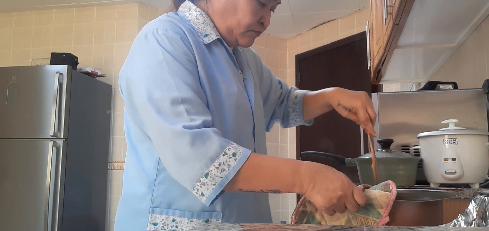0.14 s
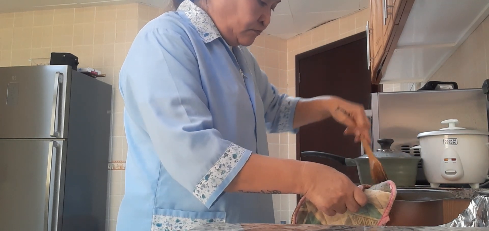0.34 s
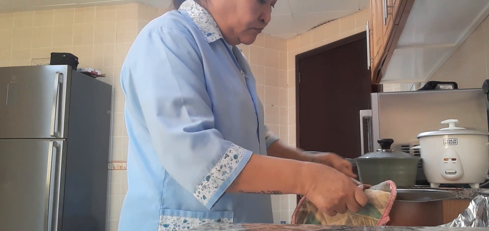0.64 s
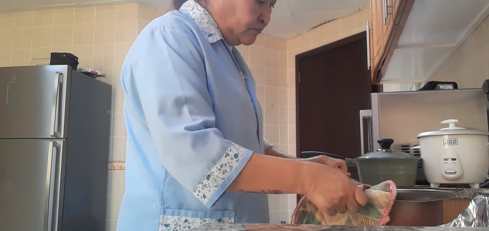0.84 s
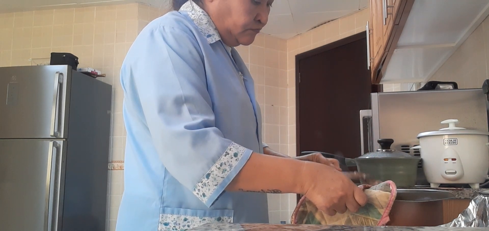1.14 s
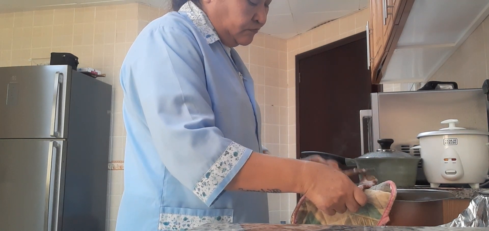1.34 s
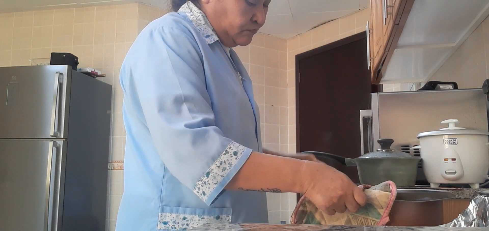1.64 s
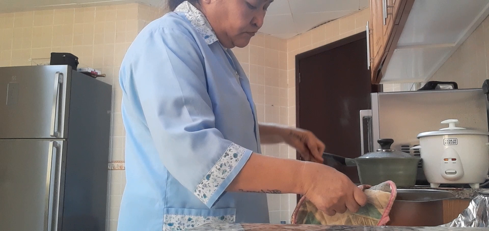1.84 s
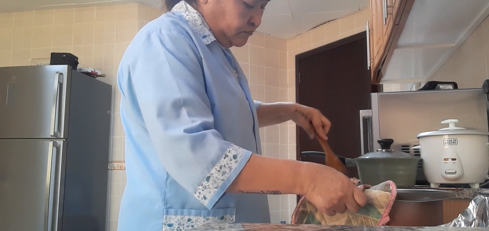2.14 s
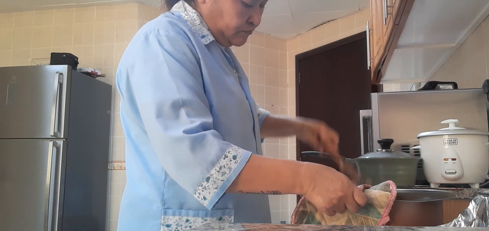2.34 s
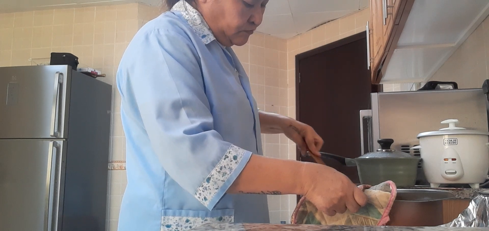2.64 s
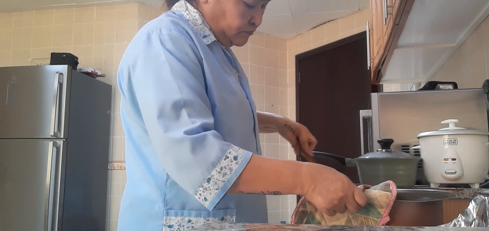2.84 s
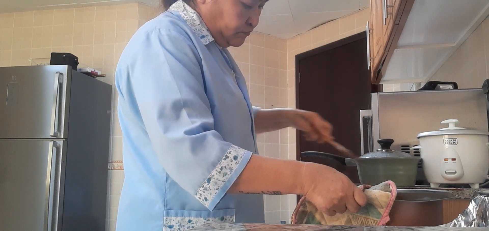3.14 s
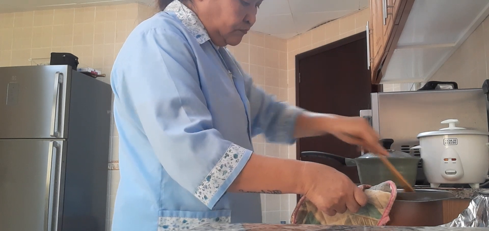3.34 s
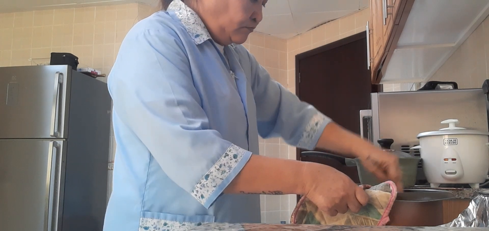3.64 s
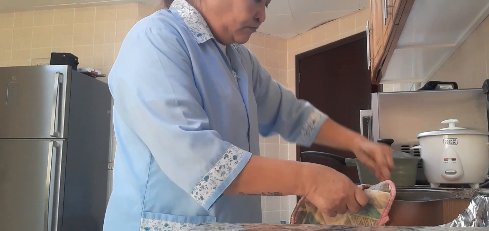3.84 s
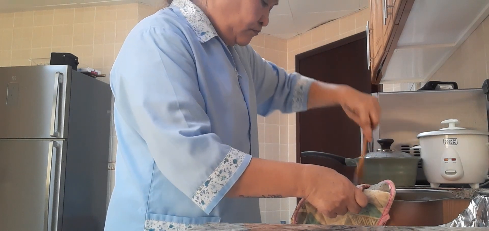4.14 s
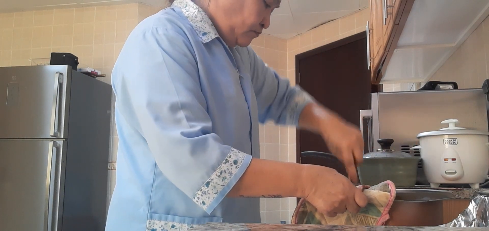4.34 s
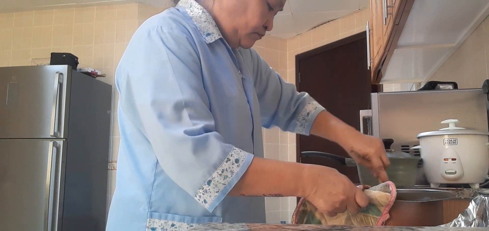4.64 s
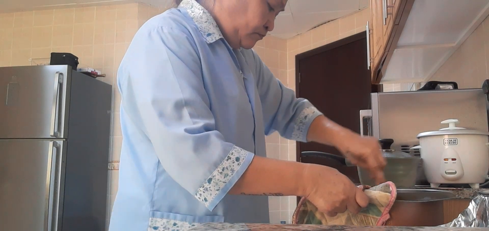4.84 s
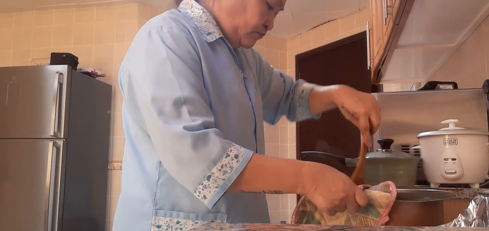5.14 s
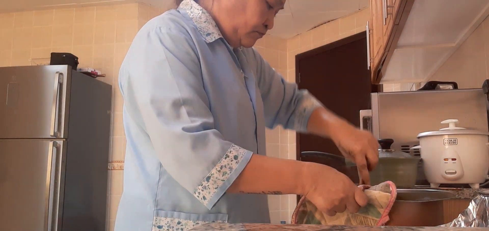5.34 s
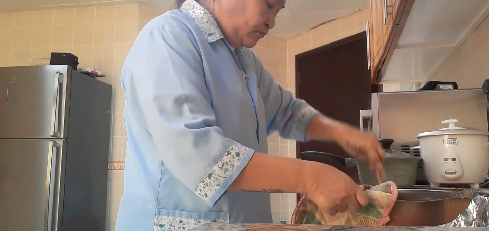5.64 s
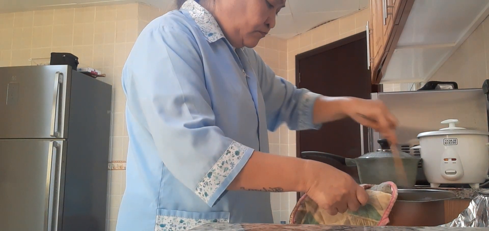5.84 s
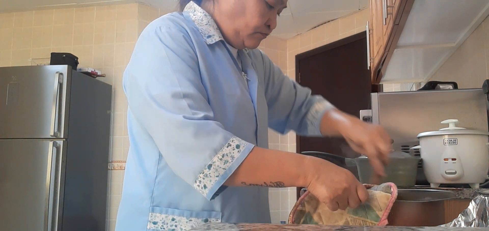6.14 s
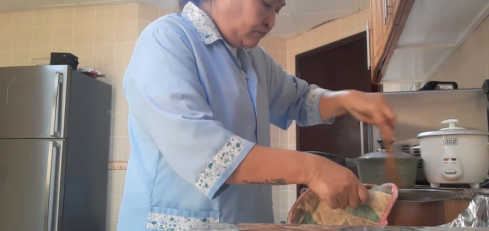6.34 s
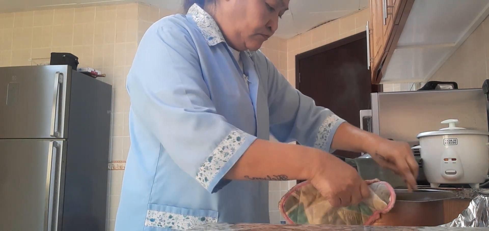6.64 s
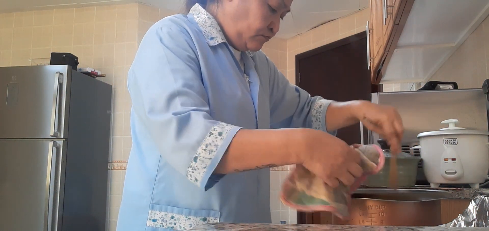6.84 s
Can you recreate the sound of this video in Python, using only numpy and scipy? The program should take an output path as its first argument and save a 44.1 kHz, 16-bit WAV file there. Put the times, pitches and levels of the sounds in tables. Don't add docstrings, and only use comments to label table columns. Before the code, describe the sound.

Someone stirs food in a metal pot with a wooden spatula, uneven knocks and short gritty scrapes ringing briefly in a hard-walled kitchen.

```python
import sys
import numpy as np
from scipy import signal
from scipy.fft import rfft, irfft, next_fast_len
from scipy.io import wavfile
from scipy.ndimage import uniform_filter1d

SR = 44100
rng = np.random.default_rng(int(sys.argv[2]) if len(sys.argv) > 2 else 0)


def to_wav(s):
    ch = np.atleast_2d(s).T
    pcm = np.round(np.clip(ch, -1, 1) * 32767)
    wavfile.write(sys.argv[1], SR, pcm.astype(np.int16))


def elevation(decibels):
    levels = np.asarray(decibels, float)
    return 10 ** (levels / 20)


N = 308259

# f/Hz, level/dB
HUM_COLOUR = [(20, -39), (45, -22), (100, -6), (160, -16), (300, -17), (800, -11.5), (1200, -15),
              (1500, -17.5), (2500, -16.5), (4500, -25.5), (6200, -20), (8500, -28), (12000, -31.5),
              (16000, -33.5)]
HUM_DB = -53
# t/s, level/dB
HUM_SWELL = [(0, -1), (.6, 0), (1.4, 2), (3.2, 2), (5.8, 1), (7, 3.5)]
# f/Hz, width/Hz, level/dB
ROOM_MODES = [(97.8, 22, 9), (193, 18, 3.5), (246, 18, 7), (359, 28.7, 14), (446, 44, -31),
              (533.4, 41, 12.5), (626, 7.5, -8), (800, 22, 8), (1030, 137, 5.5)]

# t/s, level/dB, f/Hz, length/s
BUMPS = [(0.15, -48, 200, 0.015), (0.416, -55, 636, 0.036), (0.731, -20, 206, 0.026),
         (0.859, -38, 357, 0.047), (1.018, -45, 980, 0.048), (2.21, -45, 353, 0.04), (3.63, -46, 334, 0.04),
         (3.701, -29, 346, 0.045), (3.77, -59, 350, 0.072), (4.601, -37, 783, 0.036),
         (4.648, -38, 740, 0.028), (4.786, -37.5, 484, 0.024), (4.919, -32, 340, 0.044),
         (5.374, -34.5, 640, 0.033), (5.437, -40, 581, 0.059), (5.6, -43, 357, 0.03),
         (6.048, -48, 353, 0.03), (6.13, -34, 488, 0.02), (6.185, -41, 334, 0.018),
         (6.733, -36.5, 526, 0.048), (6.768, -44, 547, 0.022), (4.925, -26, 800, 0.053),
         (4.99, -37.5, 559, 0.048)]

# t/s, contact level/dB, ring level/dB, extra bass/dB, extra treble/dB
KNOCKS = [(0.583, -5, -15.5, 0.5, -1.5), (0.724, -26.5, -27.5, -4, -7), (0.949, -25.5, -30, 1, 1),
          (1.438, -14, -23.5, -3.5, 12.5), (1.673, -29, -36.5, 10, -20), (2.448, -2, -15.5, 3.5, 6),
          (3.443, -26, -38, 0.5, 0.5), (4.271, -23.5, -34, -8, -6), (4.786, -34, -41, -4, -28),
          (4.97, -20.5, -27, -19.5, 4.5), (5.209, -13, -25.5, -3.5, 4.5), (5.986, -29.5, -36.5, -5.5, -1.5),
          (6.5, -34.5, -43, -7, 1), (6.983, -15.5, -25.5, 5, 5.5)]
# contact colour (f/Hz, level/dB), ringing modes (f/Hz, level/dB, T60/s)
BOTTOM = ([(59, -47), (100, -33), (343, -8.5), (415, -17.5), (524, -8), (721, -18), (784, -15),
           (1280, -22.5), (1650, -18.5), (2930, -44), (5080, -23.5), (16000, -78.5)], [(200.6, -12.5, 0.32),
           (257, -15, 0.15), (338, -9, 0.35), (353, -7.5, 0.37), (526, -9, 0.14), (606, -9.5, 0.29),
           (778, -7, 0.1), (1196, -13.5, 0.3), (1609, -5.5, 0.17), (1815, -15.5, 0.72), (1940, -20, 0.088),
           (4180, -20, 0.23), (5870, -19, .06)])
WALL = ([(59, -52), (100, 4), (189, -13), (283, -16), (335, -7), (433, -16.5), (608, 0.5), (836, -11),
         (991, 2.5), (1390, -18.5), (4020, -33.5), (16000, -51)], [(210, -4, 0.095), (338, -8.5, 0.17),
         (640, -8, .06), (964, 7.5, 0.025), (1043, -15, 0.21), (1604, -9.5, 0.096), (4090, -10.5, 0.14)])
RIM = ([(59, -55), (100, -27.5), (295, -20), (335, 2), (424, -25.5), (524, -10), (676, -17), (1200, -12.5),
        (1280, -16), (3120, -32.5), (3940, -28.5), (6290, -18.5), (9410, -40), (16000, -46.5)],
        [(334, -3, 0.066), (517, -10.5, 0.19), (811, -6.5, 0.073), (1010, 4.5, 0.025), (1190, -3, 0.12),
        (3980, 2, 0.056), (4120, -5.5, 0.18), (4420, 5, .05), (4930, -6, .05), (5850, -1, 0.034),
        (6200, 4, 0.043), (7080, 7, .04)])
EDGE = ([(59, -34), (100, -8), (156, -33), (224, 0), (289, -35), (461, -1.5), (854, -13), (1080, -5),
         (1390, -32), (1610, -1.5), (3050, -17.5), (6840, -11.5), (16000, -57)], [(258, -9.5, 0.11),
         (339, -12.5, 0.22), (1038, -7, 0.12), (1122, 3, 0.066), (1160, 2.5, 0.078), (1446, 10, 0.019),
         (1860, -11, 0.26)])
LIP = ([(59, -45), (100, -16), (343, -16), (705, -8), (1230, -9), (1450, -31), (1610, -8), (3190, -19),
        (3860, -9.5), (7140, -12.5), (16000, -52)], [(353, -4, 0.1), (484, 7, 0.036), (1610, -3, 0.25),
        (3900, 6, .07), (3700, -3, 0.16)])
FOOD = ([(59, -51), (100, -30), (343, 2.5), (442, 8), (752, 2.5), (991, -6), (1310, -17), (1870, -16.5),
         (4770, -36), (7290, -29), (16000, -72)], [(353, -1, 0.093), (493, -3, 0.13), (720, 2.5, 0.053),
         (780, -4, 0.056), (980, -4.5, 0.14)])
TAP = ([(88, -34), (150, -5.5), (376, -8), (998, -9.5), (2020, -23), (5050, -30), (8730, -49), (14800, -49),
        (16000, -69)], [(966, 7.5, 0.017), (1035, -16.5, 0.093), (1196, -5, 0.095)])
CORNER = ([(59, -41), (100, -8), (350, -5.5), (705, -11), (1170, -12), (1330, -26), (1580, -9),
           (2170, -19.5), (3620, -13), (6560, -15), (16000, -46)], [(353, -1.5, 0.076), (511, -7, 0.086),
           (3600, -8, .03)])
SPOTS = [BOTTOM, TAP, TAP, WALL, TAP, RIM, LIP, CORNER, CORNER, FOOD, EDGE, CORNER, CORNER, EDGE]

# start t/s, length/s, wall pressure level/dB, food depth level/dB, wetness level/dB
STROKES = [(0.697, 0.3, -45.5, -1, -20), (0.983, 0.32, -54, 0, -22), (1.534, 0.12, -41, 5.5, -31),
           (1.71, .13, -59.5, 9.5, -13), (1.847, 0.28, -59, 3, -24), (2.148, 0.096, -51, 2, -24),
           (2.267, 0.27, -52, -16, -9), (3.482, 0.16, -42.5, -0.5, -21), (3.638, 0.18, -42, -1, -15),
           (3.841, 0.16, -42.5, -4.5, -17), (4.005, 0.32, -53.5, -7, -11), (4.297, 0.14, -40, -5.5, -19),
           (4.41, 0.36, -41, -6.5, -15), (4.753, 0.32, -51, 8.5, -8), (5.004, 0.077, -41, -6, -13),
           (5.286, 0.37, -37.5, -3.5, -19), (5.68, 0.31, -55.5, 1.5, -6), (6.023, 0.23, -43.5, -2.5, -13),
           (6.225, 0.23, -47.5, -14, -11), (6.525, 0.18, -41, -12, -15), (6.65, 0.19, -50, 6.5, -16),
           (6.857, 0.088, -55, -1, -5)]
# f/Hz, width/Hz, level/dB
PUSH_MODES = [(206, 19.5, -0.5), (350, 32, 1.5), (522, 33, -3), (615, 34, -1), (793, 26, -9),
              (958, 125, -8), (1170, 160, -17)]
# f/Hz, level/dB
RUB_COLOUR = [(710, 2.5), (1200, 7.5), (1350, -5.5), (1610, 2.5), (2810, -9.5), (3770, 0), (4830, -6.5),
              (6190, -5), (7730, -2.5), (10000, -30), (13000, -50), (22000, -120)]
# f/Hz, level/dB
FIZZ_COLOUR = [(5000, -29), (8500, -8), (11000, -1), (14000, -0.5), (16000, -11)]
SETTLE_S, LIFT_S = 0.018, 0.032
# crest place (0-1), loss at the far end/dB
PUSH_SHAPE, RUB_SHAPE, FIZZ_SHAPE = (0.41, -6), (0.1, -14.5), (0.24, -6.5)

# f/Hz, T60/s
ROOM_T60 = [(60, 1), (200, 0.6), (500, 0.46), (1200, 0.58), (3000, 0.97), (6000, 0.66), (10000, 0.64),
            (16000, 0.55)]
# t/s, level/dB
ECHOES = [(.0021, 0.5), (.0046, -9.5), (.0075, -2.5), (0.0103, -4), (0.016, -10.5)]
# f/Hz, level/dB
STANDING = [(193, -0.5), (254, -1), (330, -11), (353, 0), (519, -6.5), (598, -21), (795, -8.5)]
# f/Hz, correlation
PORT_LIKENESS = [(50, 0.87), (250, 0.92), (600, 0.71), (1200, 0.53), (2500, 0.19), (16000, 0.046)]

# f/Hz, level/dB
PORT_TILT = [(30, 4), (100, -8.5), (380, -4), (950, -2.5), (2380, -1.5), (5000, -5), (8500, -2.5),
             (15000, 6)]
# f/Hz, phase/rad
PORT_LEAD = [(250, 0.5), (600, 0.5), (1380, -2.5), (2240, 0), (5940, -2.5), (11800, 2), (16000, 6)]
# f/Hz, width/Hz, level/dB
TABLE_DIP = [(1329, 77, -7.5)]
LOW_EDGE_HZ, HIGH_EDGE_HZ = 45, 15800


def evened(x):
    return x / np.sqrt(np.mean(x ** 2) + 1e-20)


def read(points, hz):
    f, value = np.transpose(points)
    return np.interp(np.log(hz + 1), np.log(f + 1), value)


def add(mix, s, sound):
    part = mix[round(s * SR):][:len(sound)]
    part += sound[:len(part)]


def humps(peaks, hz):
    return sum(db / (1 + (2 * (hz - f) / width) ** 2) for f, width, db in peaks)


def shaped(x, db_of_hz):
    size = next_fast_len(x.shape[-1], True)
    gain = elevation(db_of_hz(np.fft.rfftfreq(size, 1 / SR)))
    return irfft(rfft(x, size) * gain, size)[..., :x.shape[-1]]


def causal(points, bass_db, treble_db):
    hz = abs(np.fft.fftfreq(2048, 1 / SR))
    bass = bass_db / (1 + (hz / 700) ** 2)
    treble = treble_db / (1 + (3000 / (hz + 1)) ** 4)
    log_gain = np.log(elevation(np.maximum(read(points, hz) + bass + treble, -90)))
    return np.fft.ifft(np.exp(log_gain - 1j * signal.hilbert(log_gain).imag)).real


def diffuse(size, db_field):
    frames = size // 256 + 5
    hz = np.fft.rfftfreq(1024, 1 / SR)[:, None]
    a, b, c, d = rng.standard_normal((frames, 513, 4)).T
    same = np.clip(read(PORT_LIKENESS, hz), -1, 1)
    left = a + 1j * b
    right = same * left + np.sqrt(1 - same ** 2) * (c + 1j * d)
    spectra = np.array([left, right]) * elevation(db_field(hz, np.arange(frames) * 256 / SR))
    return signal.istft(spectra, nperseg=1024, noverlap=768)[1][:, :size]


def hum():
    patches = rng.standard_normal((N // 256 + 5, 513))
    patches = uniform_filter1d(patches, 14, 0)
    patches = evened(uniform_filter1d(patches, 10, 1)).T

    def level(hz, s):
        return read(HUM_COLOUR, hz) + 1.27 * humps(ROOM_MODES, hz) + 2.23 * patches

    swell_db = np.interp(np.arange(N) / SR, *np.transpose(HUM_SWELL))
    return elevation(HUM_DB + swell_db) * evened(diffuse(N, level))


def bump(db, hz, length):
    t = np.arange(round(np.clip(length, .01, .2) * SR)) / SR
    noise = rng.standard_normal(SR // 4)
    crush = shaped(noise, lambda f: -20 * np.log10(1 + (2 * (f - 1.17 * hz) / 350) ** 2))
    tone = np.sin(2 * np.pi * hz * t)
    return elevation(db - 5) * (tone + 0.68 * evened(crush)[:len(t)]) * np.hanning(len(t))


def knock(levels, spot):
    contact_db, ring_db, bass_db, treble_db = levels
    colour, modes = spot
    t = np.arange(SR // 2) / SR
    blow = elevation(-21.5) * rng.standard_normal(len(t)) * np.exp(-t / 0.0065)
    blow[0] += 1
    contact = signal.fftconvolve(blow, causal(colour, bass_db, treble_db))[:len(t)]
    contact /= np.linalg.norm(contact)
    hz, db, t60 = np.transpose(modes)[:, :, None]
    split = np.array([-2.0, 0, 0.9, 1.8])[:, None, None] * (hz / 4000) ** 3 * 70
    clusters = np.sin(2 * np.pi * (hz + split) * t).sum(0)
    ring = (elevation(db - 60 * t / np.clip(t60, .02, .6)) * clusters).sum(0)
    onset = 1 - np.exp(-t / 0.00098)
    return elevation(contact_db + 15.5) * contact + elevation(ring_db - 12.5) * ring * onset


def stroke_levels(t):
    levels = np.zeros((3, len(t)))
    shapes = PUSH_SHAPE, RUB_SHAPE, FIZZ_SHAPE
    for start, length, pressure_db, depth_db, wet_db in STROKES:
        along = (t - start) / length
        touch = np.minimum((t - start) / SETTLE_S, 1 + (start + length - t) / LIFT_S)
        touch = np.clip(touch, 0, 1)
        for level, db, (crest, loss_db) in zip(levels, (depth_db, 0, wet_db), shapes):
            course_db = loss_db * np.clip(abs(along - crest) / (1 - crest), 0, 2)
            level += touch * elevation(pressure_db + db - 7.5 + course_db)
    return levels


def push_gain(hz):
    skirts = (elevation(db) / np.hypot(1, 2 * (hz - f) / width) ** 1.62 for f, width, db in PUSH_MODES)
    return 20 * np.log10(sum(skirts))


def strokes():
    t = np.arange(0, N + 128, 128) / SR
    levels = stroke_levels(t)
    lumps = elevation(1.66 * evened(uniform_filter1d(rng.standard_normal(N), 900)))
    slips = rng.standard_normal((3, N))
    slips *= elevation(5.2 * np.minimum(rng.exponential(1, (3, N)), 5))
    slips *= rng.random((3, N)) < .1
    push = shaped(slips[0] * lumps, push_gain)
    rub = shaped(slips[1] * lumps, lambda hz: read(RUB_COLOUR, hz))
    fizz = shaped(slips[2] * lumps ** 1.8, lambda hz: read(FIZZ_COLOUR, hz))
    times = np.arange(N) / SR
    return sum(np.interp(times, t, level) * evened(x) for level, x in zip(levels, (push, rub, fizz)))


def kitchen(pot, bumps, wet_db=4.0, standing_db=-63, bump_wet_db=-6):
    t = np.arange(SR) / SR
    tail = diffuse(SR, lambda hz, s: -60 * s / read(ROOM_T60, hz))
    tail /= np.linalg.norm(tail[0])
    for hz, db in STANDING:
        decay_db = -60 * t / read(ROOM_T60, hz)
        tail += elevation(standing_db + db + decay_db) * np.sin(2 * np.pi * hz * t)
    path = elevation(wet_db) * tail * (1 - np.exp(-t / 0.013))
    for (s, db), (shift, sign) in zip(ECHOES, rng.uniform(-1, 1, (len(ECHOES), 2))):
        arrivals = [round(s * SR), round(s * SR + 20 * shift)]
        path[[0, 1], arrivals] += elevation(db - 3.0) * np.sign(sign)
    sent = pot + elevation(bump_wet_db) * bumps
    wet = signal.fftconvolve(sent[None], path, axes=1)[:, :N]
    return elevation(-7) * pot + bumps + wet


def scene():
    pot = strokes()
    for (s, *levels), spot in zip(KNOCKS, SPOTS):
        add(pot, s - .0002, knock(levels, spot))
    bumps = np.zeros(N)
    for s, *settings in BUMPS:
        add(bumps, s - .005, bump(*settings))
    return kitchen(pot, bumps) + hum()


def band_limit(x):
    return signal.sosfilt(signal.butter(12, 16480, fs=SR, output="sos"), x)


def record(dry):
    padded = np.pad(dry, [(0, 0), (0, next_fast_len(N + 8192, True) - N)])
    hz = np.fft.rfftfreq(padded.shape[1], 1 / SR)
    side = np.array([[.5], [-.5]])
    gain = elevation(side * read(PORT_TILT, hz) + humps(TABLE_DIP, hz))
    ports = gain * np.exp(1j * side * read(PORT_LEAD, hz))
    band = 1 / (1 + (LOW_EDGE_HZ / (hz + 1)) ** 4) / (1 + (hz / HIGH_EDGE_HZ) ** 300)
    mix = irfft(rfft(padded) * ports * band, padded.shape[1])[:, :N]
    return band_limit(mix)


dry = scene()
out = record(dry)
to_wav(out)
```